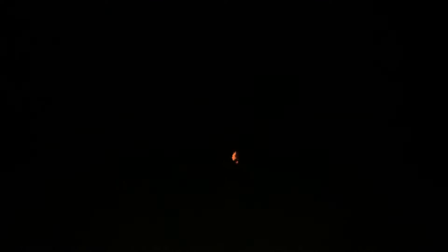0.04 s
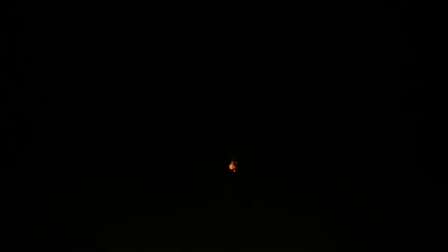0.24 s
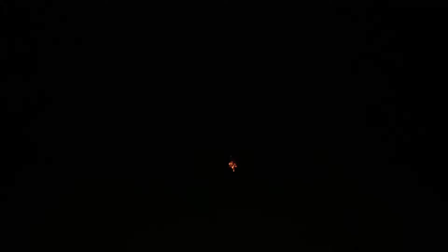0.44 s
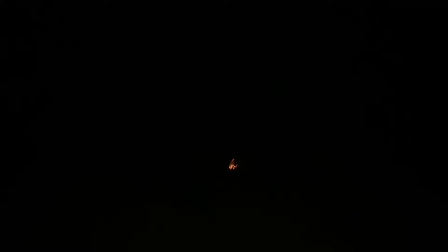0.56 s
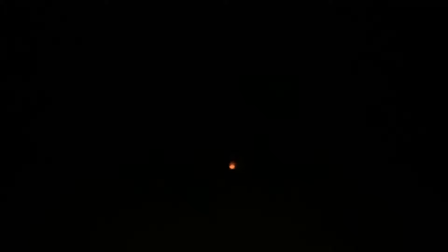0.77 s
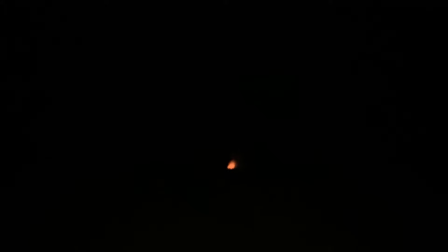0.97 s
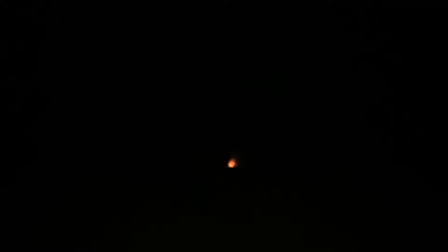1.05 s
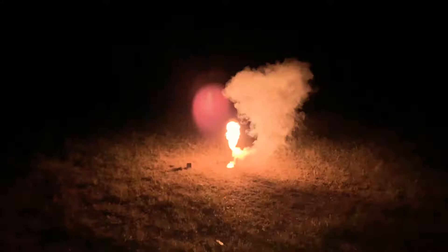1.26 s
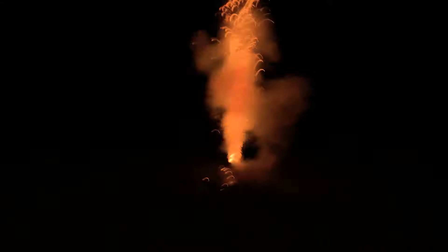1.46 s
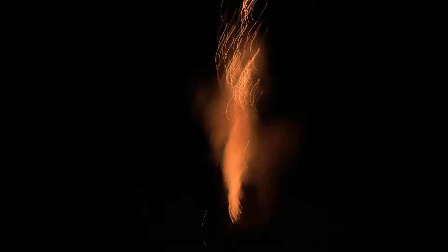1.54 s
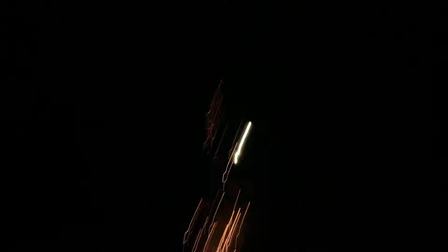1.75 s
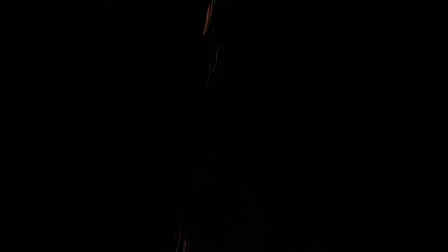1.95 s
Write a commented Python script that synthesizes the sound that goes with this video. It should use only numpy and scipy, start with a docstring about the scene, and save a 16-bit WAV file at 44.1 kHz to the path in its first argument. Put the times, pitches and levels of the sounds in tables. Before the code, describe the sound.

Quiet outdoor night with insects and a thin fluttering fuse hiss; suddenly a sharp firework launch bang cracks and thumps, the shell whooshes away, and echoes from walls and trees fade into a dull rumble.

```python
"""Single-shot firework at night

A fuse hisses as fluttering bands of noise among crickets, made of pulsed noise and a gliding tone.
The lift charge fires: a noise crack, the tube's decaying sines and a blast of gas, then the shell's rush.
Walls slap back noise bursts, trees return a wash that grows duller, and the bass rolls on.
The recorder's gain drops at the bang and creeps back too slowly to recover."""
import sys
import numpy as np
from scipy import signal
from scipy.fft import rfft, irfft, next_fast_len
from scipy.io import wavfile
from scipy.ndimage import uniform_filter1d, map_coordinates

SR = 44100
rng = np.random.default_rng(int(sys.argv[2]) if len(sys.argv) > 2 else 0)


def wrap_up_sound(samples):
    """Save the sound to the file named by the first command line argument, as 16-bit audio."""
    columns = np.atleast_2d(samples).T
    # keep every value between -1 and 1, then stretch to whole-number steps
    tamed = np.clip(columns, -1, 1)
    steps = np.round(tamed * 32767).astype(np.int16)
    wavfile.write(sys.argv[1], SR, steps)


N = 88508  # samples
FIRE_S = 1.398  # the charge ignites


def amp(db):
    """Decibels to gain."""
    return 10 ** (np.asarray(db) / 20)


def unit(x):
    """Scale to rms 1."""
    return x / np.sqrt(np.mean(x ** 2) + 1e-20)


def clock():
    """The time of every sample in seconds."""
    return np.arange(N) / SR


def curves(rows):
    """One interpolated curve for each column after the time."""
    times, *columns = np.transpose(rows)
    return [np.interp(clock(), times, column) for column in columns]


def wobble(rate):
    """A smooth random curve with rate knots a second."""
    knots = rng.standard_normal(2048)
    return map_coordinates(knots, [clock() * rate + 4], mode="wrap")


def filtered(x, response):
    """Shape x by a response of frequency, with padding so the tail does not wrap around."""
    size = next_fast_len(N + SR // 4)
    spectrum = rfft(x, size) * response(np.fft.rfftfreq(size, 1 / SR))
    return irfft(spectrum, size)[:N]


def noise(colour):
    """Noise of rms 1 whose spectrum follows rows of frequency and relative level."""
    colour_hz, colour_db = np.transpose(colour)

    def response(hz):
        return amp(np.interp(np.log(hz + 1), np.log(colour_hz), colour_db))

    return unit(filtered(rng.standard_normal(N), response))


def narrow(centre_hz, width_hz):
    """Noise of rms 1 in one steep resonance, 12 dB down at width_hz from its centre."""
    def response(hz):
        return 1 / (1 + ((hz - centre_hz) / width_hz) ** 2) ** 2

    return unit(filtered(rng.standard_normal(N), response))


def burst(start, rise, hold, t60, db):
    """An envelope that rises, holds, then falls 60 dB in t60 seconds."""
    t = clock() - start
    decay_db = 60 * np.maximum(t - rise - hold, 0) / t60
    return np.clip(t / rise, 0, 1) ** 2 * amp(db - decay_db)


# Spectrum of the distant rumble. Each row: frequency in Hz, relative level in dB.
RUMBLE_COLOUR = [(20, -2), (45, -35.5), (65, 1), (95, -3), (140, -15), (250, -18), (600, -16.5),
                 (2000, -47)]
# Soft low bumps. Each row: peak time in seconds, level in dB.
BUMPS = [(.005, -63), (.045, -68), (.105, -66), (0.544, -62.5)]
# Spectrum of the bumps. Each row: frequency in Hz, relative level in dB.
BUMP_COLOUR = [(60, 1), (130, -5), (300, -5), (500, -8), (1200, -14), (4000, -50)]
RUMBLE_DB, RUMBLE_SWELL_DB = -69, 3
BUMP_RISE_S, BUMP_T60_S = 0.0096, 0.24


def night():
    """An uneven distant rumble of low noise, with a few soft bumps that fade slowly."""
    rumble = amp(RUMBLE_DB + RUMBLE_SWELL_DB * wobble(25.14)) * noise(RUMBLE_COLOUR)
    bump_level = sum(burst(s - BUMP_RISE_S, BUMP_RISE_S, 0, BUMP_T60_S, db) for s, db in BUMPS)
    return rumble + bump_level * noise(BUMP_COLOUR)


# Far choruses of crickets. Each row: centre in Hz, width in Hz, level in dB.
CHORUSES = [(2038, 235, -57), (5750, 470, -61.5)]
CHORUS_FLUTTER_DB = 1.5


def cricket_choruses():
    """Many far crickets blur into narrow bands of noise that flutter at random."""
    return sum(amp(db + CHORUS_FLUTTER_DB * wobble(39.9)) * narrow(hz, width)
               for hz, width, db in CHORUSES)


# Spectrum of bush-cricket wings. Each row: frequency in Hz, relative level in dB.
WING_COLOUR = [(6000, -42), (8000, -15), (9000, -8.5), (11000, -11), (12500, -5.5), (14000, 0), (15000, -2),
               (16000, -19.5)]
BUZZ_HZ, BUZZ_SHARPNESS, BUZZ_DB = 88.0, 2.5, -58
RASP_FIRST_S, RASP_PERIOD_S, RASP_LENGTH_S, RASP_DB = .083, .139, .038, -55.5


def bush_crickets():
    """One buzzes without pause in rapid wing strokes; another rasps in short, regular chirps."""
    t = clock()
    stroke_phase = np.pi * (BUZZ_HZ * t + 0.097 * wobble(6.3))
    strokes = np.abs(np.cos(stroke_phase)) ** (2 * BUZZ_SHARPNESS)
    buzz = amp(BUZZ_DB) * unit(strokes * noise(WING_COLOUR))
    # progress through the chirp, 0 to 1; it waits at 1, silent, for the next
    chirp = np.minimum((t - RASP_FIRST_S) % RASP_PERIOD_S / RASP_LENGTH_S, 1)
    rasp = amp(RASP_DB) * np.abs(np.sin(np.pi * chirp)) ** .5 * noise(WING_COLOUR)
    return buzz + rasp


TRILL_FIRST_S, TRILL_PERIOD_S, TRILL_DB = .0335, .0505, -67
TRILL_HZ, TRILL_ARCH_HZ = 6930, 893  # top of the arch, fall to either end


def field_cricket():
    """A trilled tone whose syllables swell and arch in pitch, with a fast random jitter."""
    syllable = ((clock() - TRILL_FIRST_S) / TRILL_PERIOD_S + .5) % 1 - .5  # 0 at its middle
    pitch_hz = TRILL_HZ - TRILL_ARCH_HZ * (2 * syllable) ** 2 + 90 * wobble(500)
    tone = np.sin(2 * np.pi * np.cumsum(pitch_hz) / SR)
    return amp(TRILL_DB) * unit(np.cos(np.pi * syllable) ** 2 * tone)


# The burning fuse. Each row: time in seconds, level in dB, then trims in dB (before the band gains
# below) of the sizzle near 7 kHz, the flare near 3 kHz and the fizz near 10 kHz.
FUSE_COURSE = [(0.0, -51, -6, -24, -5), (0.014, -52, -3, -44, -5.5), (0.212, -51.5, -4, -22, -2.5),
               (0.228, -52, -5, -39, -2.5), (0.576, -53, -8, -17, -4), (0.758, -54.5, -9.5, -17, -4),
               (0.824, -51.5, -15.5, -8.5, -8), (1.01, -56, -8.5, -17, -6), (1.082, -53, -18, -4.5, -11),
               (1.086, -53.5, -11, -7.5, -8), (1.232, -52.5, -26, -28, -9), (1.24, -54.5, -12.5, -19, -7),
               (1.37, -47.5, -15, -20, -3)]
# Spectrum of the steady hiss. Each row: frequency in Hz, relative level in dB.
HISS_COLOUR = [(150, -38), (450, -20.5), (800, -8), (1200, -1.5), (1700, -1.5), (2500, -1), (2900, -6),
               (3300, -13.5), (3700, 0.5), (4600, -1), (5400, 0), (6400, -6.5), (7200, -18), (8000, -20),
               (9500, -19), (11300, -19), (12700, -16), (14300, -13), (15800, -19)]
# Spectrum of the sizzle. Each row: frequency in Hz, relative level in dB.
SIZZLE_COLOUR = [(5000, -39), (6000, -1), (6800, 2.5), (7400, -2.5), (8300, -7), (9200, -11), (12000, -18),
                 (16000, -29)]
# Spectrum of the fizz. Each row: frequency in Hz, relative level in dB.
FIZZ_COLOUR = [(7800, -21), (9000, -2.5), (10000, 2.5), (11500, -3), (13000, 0), (16000, -9.5)]
HISS_DB, SIZZLE_DB, FLARE_DB, FIZZ_DB = -2, 3, 2, 0.5  # band gains
FLUTTER_DB = 0.36


def fuse():
    """A fluttering jet of hiss whose bands flare and fade; it ends with the shot."""
    level_db, sizzle_db, flare_db, fizz_db = curves(FUSE_COURSE)
    jet = amp(HISS_DB) * noise(HISS_COLOUR)
    jet += amp(SIZZLE_DB + sizzle_db) * noise(SIZZLE_COLOUR)
    jet += amp(FIZZ_DB + fizz_db) * noise(FIZZ_COLOUR)
    jet += amp(FLARE_DB + flare_db) * narrow(centre_hz=3080, width_hz=1300)
    return amp(level_db + FLUTTER_DB * wobble(130)) * jet * (clock() < FIRE_S)


# From here to the lift charge, levels are relative: scene() raises them all by this gain.
SHOT_GAIN_DB = 9

# Slaps from nearby walls. Each row: peak time in seconds, level in dB.
SLAPS = [(1.466, -26.5), (1.487, -25), (1.519, -27.5), (1.585, -25), (1.623, -33), (1.641, -20.5),
         (1.653, -27), (1.677, -23), (1.707, -37), (1.754, -30.5), (1.792, -30.5), (1.845, -32.5)]
# Spectrum of the slaps. Each row: frequency in Hz, relative level in dB.
SLAP_COLOUR = [(80, -4), (250, -4.5), (550, -8), (950, 4.5), (1300, -4), (1600, -2.5), (1900, -12.5),
               (2800, -8.5), (6000, -24), (14000, -37)]
SLAP_RISE_S, SLAP_T60_S = 0.0027, 0.045


def wall_slaps():
    """Each wall throws back a short burst of noise."""
    level = sum(burst(s - SLAP_RISE_S, SLAP_RISE_S, 0, SLAP_T60_S, db) for s, db in SLAPS)
    return level * noise(SLAP_COLOUR)


# Answer of the trees. Each row: time in seconds, level in dB before the trim below.
TREES = [(1.55, -54), (1.56, -38.5), (1.622, -31.5), (1.716, -38.5), (1.746, -36), (1.874, -45),
         (1.926, -52), (2.0, -51)]
# Spectrum of the trees' answer as it arrives. Each row: frequency in Hz, relative level in dB.
TREES_COLOUR = [(200, -12), (400, -5), (650, -7.5), (1000, 0), (1400, -4.5), (1600, -2), (1800, -8),
                (2100, 2.5), (2350, -4.5), (2800, -1.5), (4200, -1), (5600, 1), (7500, -4), (10000, -8),
                (16000, -15)]
TREES_RISE_S, TREES_TRIM_DB = .03, 1.5
AIR_DB_PER_S_KHZ, AIR_PIVOT_KHZ = 9, 4.5


def tree_wash():
    """Trees scatter a wash of noise; the longer its path through air, the duller its balance."""
    first_s = TREES[0][0]
    hz, frame_s, frames = signal.stft(noise(TREES_COLOUR), SR, nperseg=512)
    above_pivot_khz = hz[:, None] / 1000 - AIR_PIVOT_KHZ
    # the tilt deepens with time: treble sinks and the tones below the pivot gain
    air = amp(-AIR_DB_PER_S_KHZ * above_pivot_khz * np.maximum(frame_s - first_s, 0))
    wash = signal.istft(frames * air, SR, nperseg=512)[1][:N]
    level_db, = curves(TREES)
    arrival = np.clip((clock() - first_s) / TREES_RISE_S + 1, 0, 1)
    return arrival * amp(level_db + TREES_TRIM_DB + 0.8 * wobble(200)) * wash


# Spectrum of the low roll. Each row: frequency in Hz, relative level in dB.
ROLL_COLOUR = [(20, -30), (45, -23), (70, -2.5), (120, 0), (200, -5.5), (300, -9.5), (500, -8.5),
               (1000, -17), (3000, -57)]
# Pitches that linger in the echo. Each row: centre in Hz, width in Hz, level in dB.
RINGS = [(1060, 58, -46.5), (1573, 50, -47.5)]
ROLL_S, ROLL_RISE_S, ROLL_HOLD_S, ROLL_T60_S, ROLL_DB = 1.53, .05, .21, 0.69, -38.5
RING_T60_S = 0.83


def rolling_echo():
    """Bass noise rolls on, while narrow bands of noise linger as faint pitches."""
    roll = burst(ROLL_S, ROLL_RISE_S, ROLL_HOLD_S, ROLL_T60_S, ROLL_DB) * noise(ROLL_COLOUR)
    rings = sum(burst(TREES[0][0], ROLL_RISE_S, ROLL_HOLD_S, RING_T60_S, db) * narrow(hz, width)
                for hz, width, db in RINGS)
    return roll + rings


# Spectrum of the shell's rush. Each row: frequency in Hz, relative level in dB.
RUSH_COLOUR = [(100, 10), (250, 9.5), (500, 6.5), (1000, 1.5), (1300, -4), (1850, -7), (2400, -2.5),
               (3500, -2), (5000, -1.5), (7000, -1.5), (9000, -8), (13000, -7.5), (16000, -13)]
# Spectrum of the fizzing tail. Each row: frequency in Hz, relative level in dB.
SPARKS_COLOUR = [(2000, -2), (6000, -4), (10000, -7), (14000, -5), (16000, -12)]
# Low surges of air. Each row: middle in seconds, pitch in Hz, length in seconds, peak level in dB.
SURGES = [(1.416, 76, .04, -27.5), (1.452, 61, 0.032, -22.5), (1.508, 67, 0.037, -23),
          (1.527, 178, 0.028, -22.5), (1.79, 193, 0.035, -33)]
RUSH_S, RUSH_RISE_S, RUSH_HOLD_S, RUSH_T60_S, RUSH_DB = 1.436, .024, .03, 0.3, -27.5
SPARKS_DB = -63.5


def shell():
    """The rising shell rushes and fades over steady sparks, while the air heaves in low surges."""
    out = burst(RUSH_S, RUSH_RISE_S, RUSH_HOLD_S, RUSH_T60_S, RUSH_DB) * noise(RUSH_COLOUR)
    out += amp(SPARKS_DB) * noise(SPARKS_COLOUR) * (clock() > RUSH_S)
    for middle_s, hz, length_s, db in SURGES:
        t = clock() - middle_s
        swell = np.cos(np.pi * np.clip(t / length_s, -.5, .5)) ** 2
        out -= amp(db) * swell * np.cos(2 * np.pi * hz * t)
    return out


# Spectrum of the igniting powder. Each row: frequency in Hz, relative level in dB.
CRACK_COLOUR = [(200, -3), (900, 3), (1800, 0), (2700, -12.5), (3800, -2.5), (5000, -13.5), (6400, -2),
                (8500, -16), (16000, -16)]
LEAD_DB, LEAD_RISE_DB_PER_S = -38, 800
SPUTTER_S, SPUTTER_DB = .005, -23
CRACK_DB, CRACK_T60_S = -12, .006
CRACK_RING_DB, CRACK_RING_T60_S = -19, 0.1


def powder():
    """A hiss swells quickly into the shot, the powder sputters, then cracks with a fast and a slow decay."""
    t = clock() - FIRE_S
    lead = amp(LEAD_DB - LEAD_RISE_DB_PER_S * np.abs(t))
    sputter = amp(SPUTTER_DB + 1.3 * wobble(1300)) * np.clip(1 + t / SPUTTER_S, 0, 1) ** .5
    after = np.maximum(t, 0)
    crack = amp(CRACK_DB - 60 * after / CRACK_T60_S)
    crack += amp(CRACK_RING_DB - 60 * after / CRACK_RING_T60_S)
    return np.where(t < 0, lead + sputter, crack) * noise(CRACK_COLOUR)


# Modes of the tube. Each row: frequency in Hz, level in dB before attack and low cut, t60 in seconds.
TUBE_MODES = [(291.2, 2, 0.031), (398, -4, 0.021), (575, -6, 0.019), (960, -11.5, .022)]
THUMP_DELAY_S, THUMP_ATTACK_S, THUMP_LOW_CUT_HZ = .0007, .0004, 139


def tube_thump():
    """The struck tube sounds its modes as quickly dying sines."""
    t = np.maximum(clock() - FIRE_S - THUMP_DELAY_S, 0)
    thump = sum(amp(db - 60 * t / t60) * np.sin(2 * np.pi * hz * t) for hz, db, t60 in TUBE_MODES)
    thump *= 1 - np.exp(-t / THUMP_ATTACK_S)
    low_cut = signal.butter(2, THUMP_LOW_CUT_HZ, "high", fs=SR, output="sos")
    return signal.sosfilt(low_cut, thump)


# Spectrum of the escaping gas. Each row: frequency in Hz, relative level in dB.
BLAST_COLOUR = [(40, -22), (150, -4.5), (290, 0.5), (480, 6), (800, -2.5), (1600, 1.5), (2400, -4.5),
                (3800, -4), (5200, -6), (7000, -5.5), (9000, -10.5), (13000, -12), (16000, -16)]
BLAST_S, BLAST_RISE_S, BLAST_HOLD_S, BLAST_T60_S, BLAST_DB = 1.4115, .0085, .0105, .019, -9
GROUND_TRIP_S, GROUND_RETURN = .0037, .18  # delay of the ground reflection, share that comes back
SCATTER_DB, SCATTER_T60_S = -32, 0.094


def muzzle_blast():
    """Gas bursts out, coloured by a quick reflection from the ground; the ground nearby also scatters it."""
    def reflected(hz):
        return 1 / (1 - GROUND_RETURN * np.exp(-2j * np.pi * hz * GROUND_TRIP_S))

    gas = unit(filtered(noise(BLAST_COLOUR), reflected))
    blast = burst(BLAST_S, BLAST_RISE_S, BLAST_HOLD_S, BLAST_T60_S, BLAST_DB) * gas
    scatter_hold_s = BLAST_S + BLAST_RISE_S + BLAST_HOLD_S - FIRE_S
    scatter = burst(FIRE_S, BLAST_RISE_S, scatter_hold_s, SCATTER_T60_S, SCATTER_DB)
    return blast + scatter * noise(BLAST_COLOUR)


def lift_charge():
    """Powder, tube and gas together; the thump starts with a downward swing of pressure."""
    return powder() - tube_thump() + muzzle_blast()


def scene():
    """Fuse, shot and echoes among the sounds of the night."""
    background = night() + cricket_choruses() + bush_crickets() + field_cricket()
    echoes = wall_slaps() + tree_wash() + rolling_echo()
    shot = amp(SHOT_GAIN_DB) * (echoes + shell() + lift_charge())
    return (background + fuse() + shot)[None]


LIMIT_DB, RECOVERY_DB_PER_S, DETECTOR_S = -7, 2, 0.005
CLIP_TOP, TOP_HZ = 1, 15850  # ceiling of the soft clipping, top of the band


def record(dry):
    """The gain drops at the bang and recovers slowly; peaks are rounded off and the band is limited."""
    power = np.abs(uniform_filter1d(dry[0] ** 2, max(round(DETECTOR_S * SR), 1)))
    over_db = np.maximum(10 * np.log10(power + 1e-12) - LIMIT_DB, 0)
    recovery_db = RECOVERY_DB_PER_S * clock()
    # the deepest cut so far, less what has been recovered since
    gain_db = recovery_db - np.maximum.accumulate(over_db + recovery_db)
    held = dry[0] * amp(gain_db)
    rounded = held / (1 + np.abs(held / CLIP_TOP) ** 4) ** (1 / 4)
    return filtered(rounded, lambda hz: hz < TOP_HZ)[None]


dry = scene()
out = record(dry)
wrap_up_sound(out)
```